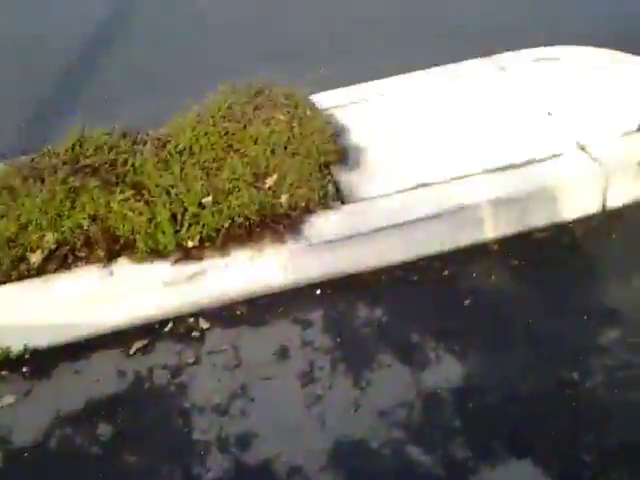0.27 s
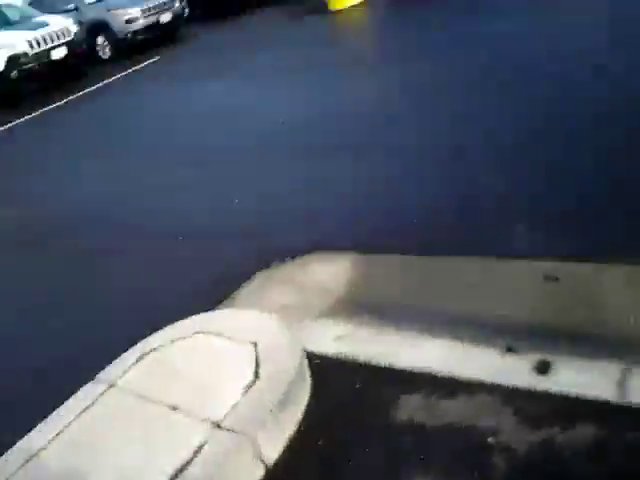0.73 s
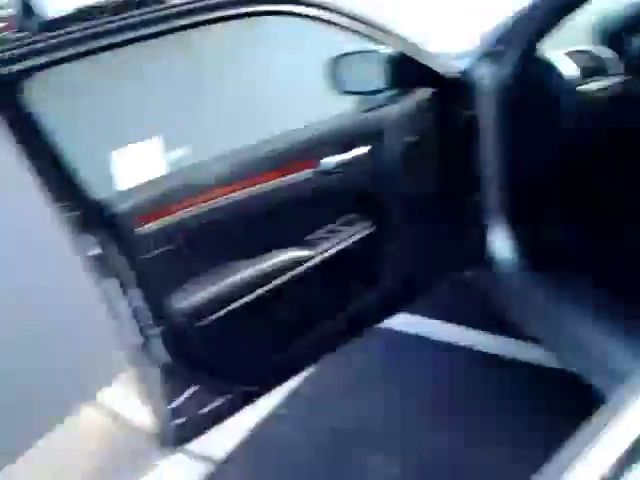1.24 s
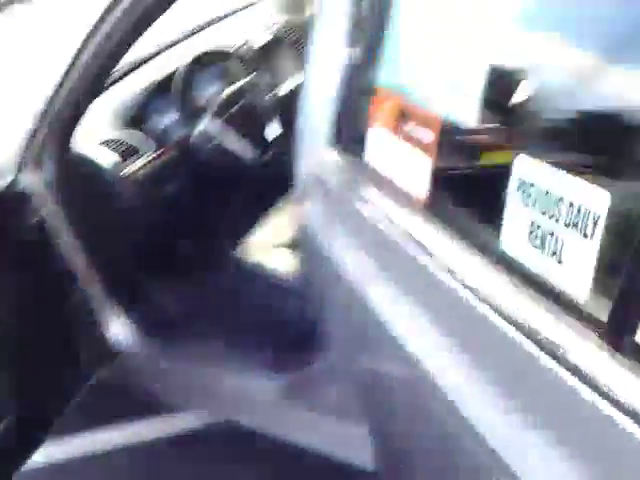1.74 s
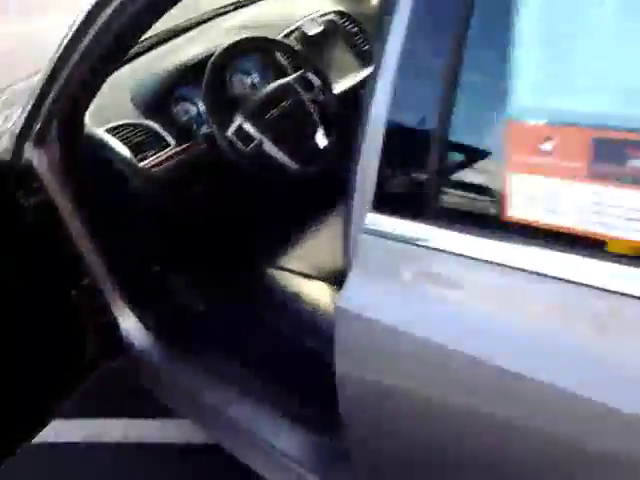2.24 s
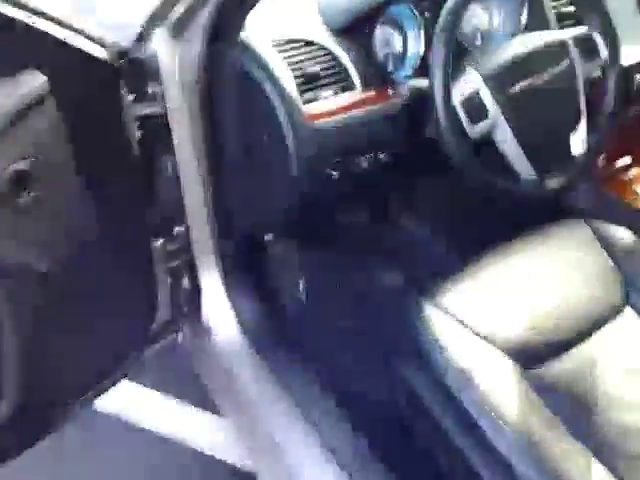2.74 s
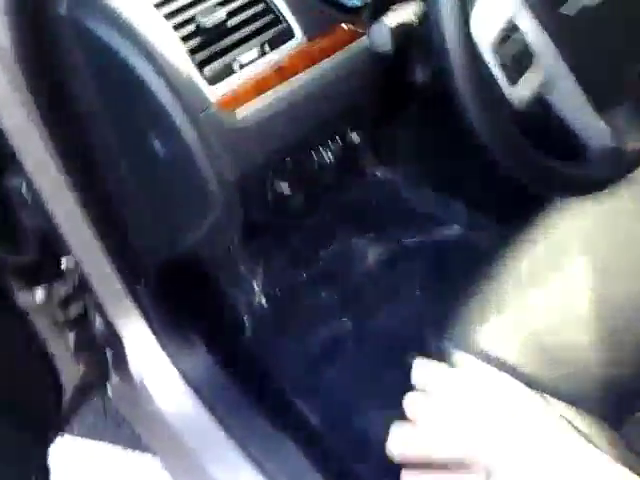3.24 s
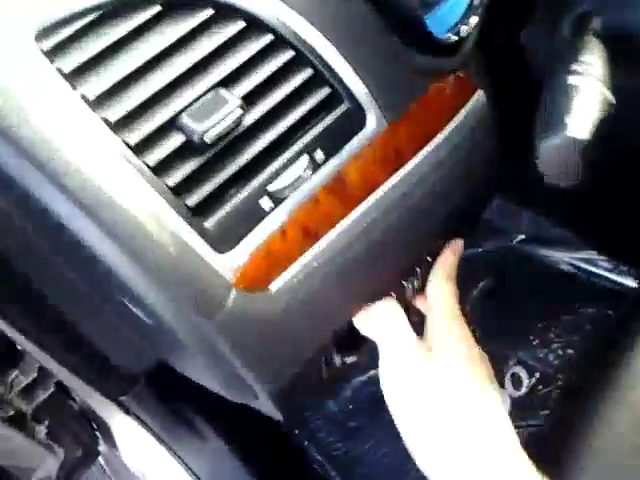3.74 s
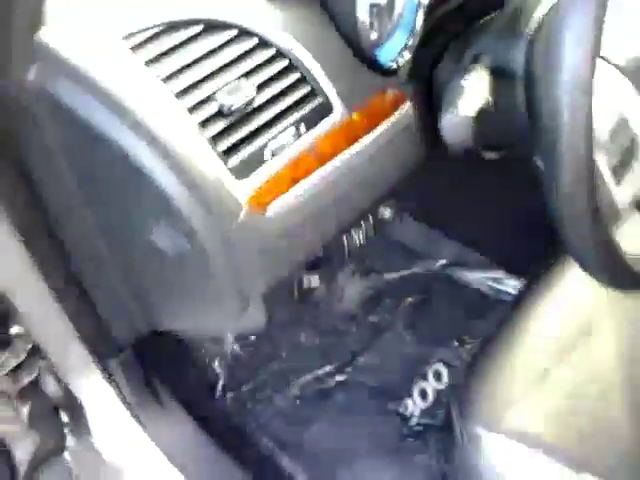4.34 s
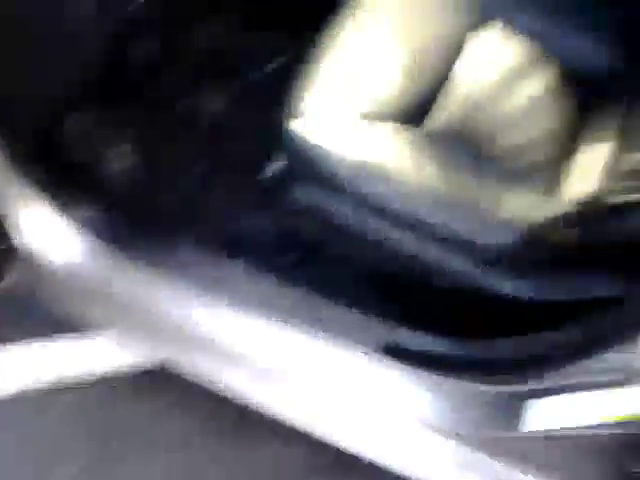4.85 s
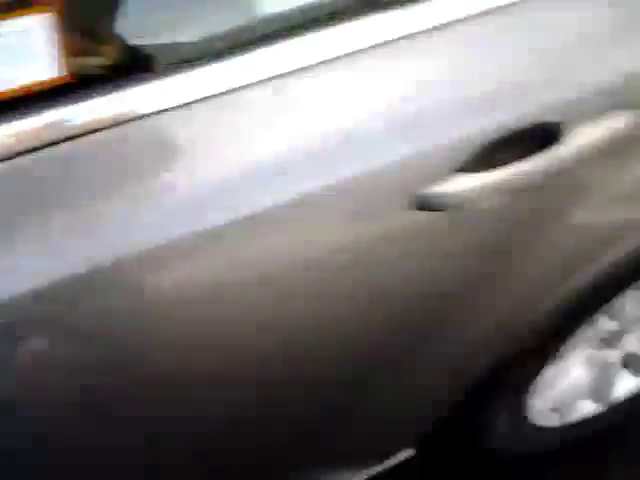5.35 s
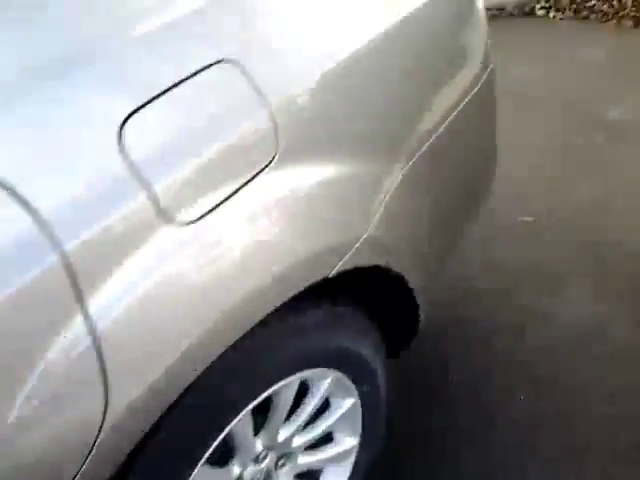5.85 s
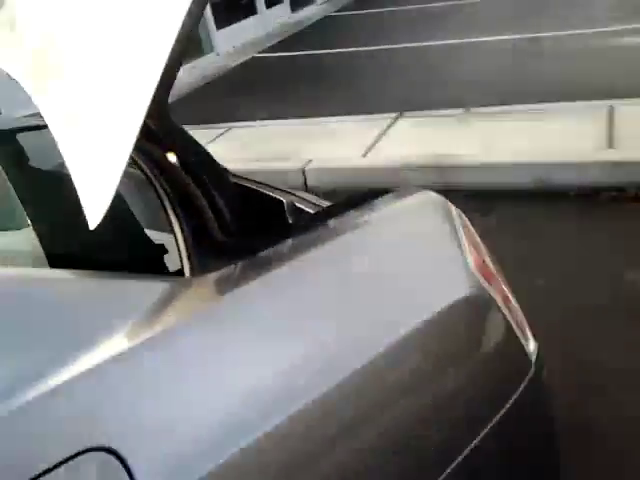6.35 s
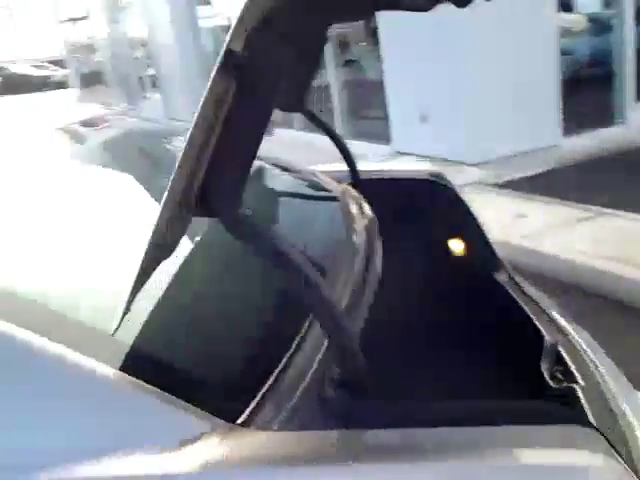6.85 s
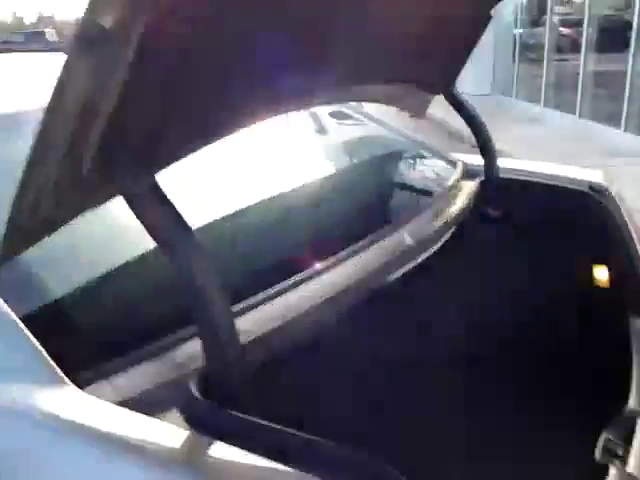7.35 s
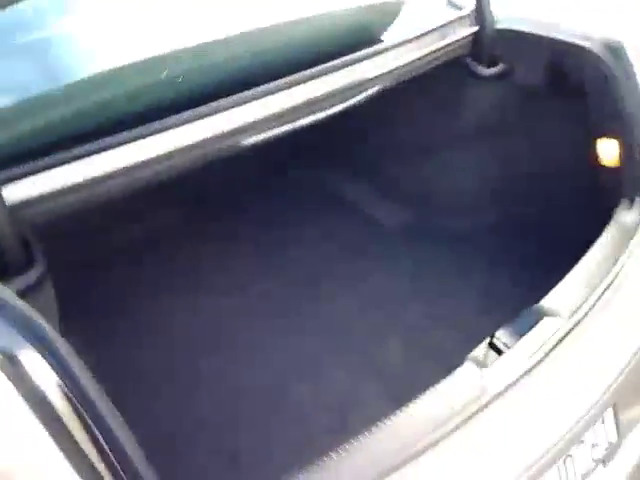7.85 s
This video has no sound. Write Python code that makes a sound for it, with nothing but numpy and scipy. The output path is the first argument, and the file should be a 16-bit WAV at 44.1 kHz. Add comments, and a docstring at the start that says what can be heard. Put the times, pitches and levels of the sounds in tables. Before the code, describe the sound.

Open car park, handheld phone microphone. Soft distant traffic roar and faint low hum run throughout; a vehicle passes early with a brief rising tyre whine. Close cloth and shoe rustle, gritty scrapes and tiny bright ticks continue on and off. A heavy rattling door knock comes first, then a shorter double-edged latch knock, and later a sharp trunk knock with dying rattle. Afterwards it thins to traffic and light rustling.

```python
"""Open car park: someone walks round parked cars holding a phone.
Far traffic, a vehicle going by, a drone and a motor hum: shaped noise, narrow noise bands and a sine.
Soles and cloth rustle and scrape: noise mixed with random grains.
Ticks on the phone, grit underfoot and latch contacts: short pings, scratches and snaps.
Three knocks of door and trunk latch, among lesser blows: thuds, ringing panel, rattling latch."""
import sys
import numpy as np
from scipy import signal
from scipy.fft import rfft, irfft
from scipy.io import wavfile

SR = 44100
rng = np.random.default_rng(int(sys.argv[2]) if len(sys.argv) > 2 else 0)


def transcribe(signal):
    """Save signal, clipped to [-1, 1], as a 16-bit WAV file at the path in sys.argv[1]."""
    frames = np.atleast_2d(signal).T
    limited = np.clip(frames, -1, 1)
    pcm = np.round(limited * 32767).astype(np.int16)
    wavfile.write(sys.argv[1], SR, pcm)


N = 356724
TIME_S = np.arange(N) / SR


def amp(db):
    """dB to gain."""
    return 10 ** (np.asarray(db) / 20)


def rms_one(x):
    """Scale to rms 1."""
    return x / np.sqrt(np.mean(x ** 2) + 1e-20)


def level_curve(rows):
    """Interpolate (time_s, level_db) rows to every sample, in dB."""
    time_s, level_db = np.transpose(rows)
    return np.interp(TIME_S, time_s, level_db)


def drift(knots_per_s):
    """Random wander: unit-spread normal knots joined by straight lines, at most 60 per second."""
    knots = rng.standard_normal(int(N / SR * 60) + 2)
    return np.interp(TIME_S * min(knots_per_s, 60), np.arange(len(knots)), knots)


def noise():
    """White noise of rms near 1."""
    return rng.standard_normal(N)


def coloured(x, spectrum):
    """Filter a white signal to a spectrum drawn over log frequency; rms 1."""
    freq_hz, density_db = np.transpose(spectrum)
    log_hz = np.log(np.arange(N // 2 + 1) * SR / N + 1e-3)
    gain_db = np.interp(log_hz, np.log(freq_hz), density_db, left=-120, right=-120)
    return rms_one(irfft(rfft(x) * amp(gain_db), N))


def filtered(x, order, edge_hz, kind):
    """Butterworth filter."""
    return signal.sosfilt(signal.butter(order, edge_hz, kind, fs=SR, output="sos"), x)


def narrow(centre_hz, width_hz):
    """Noise in a narrow band round a fixed or moving centre; rms 1."""
    slow = filtered(rng.standard_normal((2, N)), 2, width_hz / 2, "low")
    phase = 2 * np.pi * np.cumsum(centre_hz * np.ones(N)) / SR
    return rms_one(slow[0] * np.cos(phase) + slow[1] * np.sin(phase))


def grains(per_s, spread_db):
    """Random contacts with uneven strengths and signs; rms 1."""
    sizes = amp(spread_db * np.minimum(rng.exponential(1, N), 4))
    signed = sizes * rng.choice([-1, 1], N)
    return rms_one(signed * (rng.random(N) < per_s / SR))


def ring(x, pitch_hz, t60_s):
    """Two-pole resonator: a unit click sets a decaying sine of height 1 ringing."""
    radius = amp(-60 / (max(t60_s, .001) * SR))
    turn = 2 * np.pi * pitch_hz / SR
    feedback = [1, -2 * radius * np.cos(turn), radius * radius]
    return signal.lfilter([0, np.sin(turn)], feedback, x + 1e-18)


def modes(x, table):
    """A body: its modes ring in parallel, signs alternating."""
    body = np.zeros(N)
    for k, (pitch_hz, level_db, t60_s) in enumerate(table):
        body += (-1) ** k * amp(level_db) * ring(x, pitch_hz, t60_s)
    return body


def add(track, start_s, piece):
    """Mix a piece in at its start time."""
    at = round(start_s * SR)
    track[at:at + len(piece)] += piece[:N - at]


# far tyre roar: time_s, level_db
ROAR_LEVEL = [(0, -42.5), (.5, -40.5), (1.1, -39.5), (1.5, -42), (1.95, -39.5), (2.55, -41.5),
              (2.85, -42.5), (3.6, -42.5), (4.4, -42), (5.4, -42.5), (6.05, -40.5), (6.8, -40.5),
              (7.1, -41.5), (8.09, -44)]
# relative spectra of engine rumble and tyre roar: freq_hz, density_db
RUMBLE_SPECTRUM = [(18, -56), (30, -56), (59, -46), (74, -9.5), (118, -4.5), (150, -6), (201, 1.5),
                   (480, 1), (620, -94), (1060, -120)]
ROAR_SPECTRUM = [(280, -93), (480, 1), (892, 0.5), (1450, -7), (1910, -7.5), (2280, -10), (2800, -14.5),
                 (3640, -17), (6160, -120)]
RUMBLE_DB, RUMBLE_FOLLOWS = -45.5, 0.716   # level at mean traffic; share of the roar's dB swing


def far_traffic():
    """Distant engines and tyres: two shaped noises that swell together, each with its own wander."""
    roar_db = level_curve(ROAR_LEVEL)
    rumble_db = RUMBLE_DB + RUMBLE_FOLLOWS * (roar_db - roar_db.mean())
    rumble = amp(rumble_db + 2.8 * drift(7.2)) * coloured(noise(), RUMBLE_SPECTRUM)
    roar = amp(roar_db + 1.2 * drift(12)) * coloured(noise(), ROAR_SPECTRUM)
    return rumble + roar


# relative spectrum of the nearer vehicle: freq_hz, density_db
PASSING_SPECTRUM = [(88, -46), (150, -11), (243, 2), (376, -4), (498, -53), (638, -9), (685, -5.5),
                    (898, -5), (1230, -9), (1510, -8), (2500, -17.5), (3250, -39.5), (5500, -120)]
PASS_DB, PASS_NEAREST_S, PASS_SPAN_S = -37, 1.22, 0.635   # span: nearest distance over speed
PASS_HIDDEN_S, PASS_HIDE_FADE_S = 3.19, 0.23
WHINE_DB, WHINE_S, WHINE_FADE_DB = -40.5, 1.1, 61.5   # top level, its time, loss 1 s away from it
WHINE_HZ, WHINE_CLIMB_HZ_PER_S, WHINE_TOP_HZ = 874.4, 220, 909   # pitch at WHINE_S, climb, ceiling


def passing_vehicle():
    """Noise falling as 1/distance until hidden, with a tyre whine that climbs as the vehicle speeds up."""
    distance = np.hypot(1, (TIME_S - PASS_NEAREST_S) / PASS_SPAN_S)
    in_view = np.clip((PASS_HIDDEN_S - TIME_S) / PASS_HIDE_FADE_S, 0, 1)
    wash = amp(PASS_DB) * in_view / distance * coloured(noise(), PASSING_SPECTRUM)
    from_top_s = TIME_S - WHINE_S
    whine_hz = np.minimum(WHINE_HZ + WHINE_CLIMB_HZ_PER_S * from_top_s, WHINE_TOP_HZ)
    whine = amp(WHINE_DB - WHINE_FADE_DB * from_top_s ** 2) * narrow(whine_hz, width_hz=130.0)
    return wash + whine


# motor hum: time_s, level_db
HUM_LEVEL = [(0, -54), (2.5, -54), (3.1, -71), (4.9, -66.5), (5.4, -53), (6.4, -61), (6.9, -85),
             (7.5, -58.5), (8.09, -55.5)]
HUM_HZ = 127.1
PARTNER_HZ, PARTNER_REL_DB, PARTNER_WIDTH_HZ = 190, -6, 8.6   # rough tone, level relative to the hum


def motor_hum():
    """A wavering sine and a rough narrow-band partner that comes and goes with it."""
    level_db = level_curve(HUM_LEVEL)
    phase = 2 * np.pi * HUM_HZ * TIME_S + 0.45 * drift(1.88)
    hum = np.sqrt(2) * amp(level_db + 2.44 * drift(2.43)) * np.sin(phase)
    return hum + amp(level_db + PARTNER_REL_DB) * narrow(PARTNER_HZ, PARTNER_WIDTH_HZ)


# rustle of soles and cloth, then its fine hiss: time_s, level_db
RUSTLE_LEVEL = [(0, -40.5), (.13, -45), (.85, -45), (1.3, -41), (1.6, -45), (1.85, -40.5), (2.23, -41),
                (2.34, -48), (2.59, -43.5), (2.81, -41.5), (2.95, -52), (3.2, -44.5), (3.55, -43),
                (3.83, -50.5), (4.1, -43.5), (4.44, -49.5), (4.59, -44), (5.27, -42.5), (5.72, -47),
                (6.24, -45), (6.94, -49), (7.19, -46), (7.8, -53), (8.09, -49)]
HISS_LEVEL = [(0.0, -56), (0.97, -63.5), (1.67, -55), (1.93, -50), (2.34, -63.5), (2.57, -54.5),
              (2.79, -52), (2.95, -63), (3.2, -56.5), (3.45, -53.5), (3.78, -58.5), (4.44, -57.5),
              (4.64, -56), (7.14, -59.5), (7.79, -62), (8.09, -61.5)]
# relative spectra of the rustle and of all fine friction hiss: freq_hz, density_db
RUSTLE_SPECTRUM = [(1180, -13.5), (2000, -9.5), (2760, -2.5), (3690, 1.5), (4170, 4), (4960, -5.5),
                   (5800, -14.5), (6500, -18.5), (8450, -30.5), (14300, -120)]
HISS_SPECTRUM = [(3530, -5.5), (6000, -4.5), (10000, -6.5), (12600, -13), (14100, -11.5), (15000, -21),
                 (15500, -52)]


def rustle():
    """Smooth friction: noise and dense grains that swell and flutter, with body and hiss."""
    friction = noise() + 0.542 * grains(1400, spread_db=5.53)
    flutter = amp(.8 * drift(30))
    body = amp(level_curve(RUSTLE_LEVEL)) * coloured(friction, RUSTLE_SPECTRUM)
    hiss = amp(level_curve(HISS_LEVEL)) * coloured(friction, HISS_SPECTRUM)
    return flutter * (body + hiss)


# short scrapes: start_s, end_s, body_db, hiss_db (levels at the start), change_db (start to end)
SCRAPES = [(0, 0.088, -46, -42.5, -1), (0.187, 0.221, -42, -40, -5), (0.26, 0.318, -42, -50, -4),
           (0.625, 0.703, -34, -51.5, -6.5), (0.698, 0.729, -50, -53, 0), (1.319, 1.389, -35, -57, 3.5),
           (1.384, 1.423, -40, -51, -7.5), (1.512, 1.533, -52.5, -40, -8), (1.77, 1.896, -43.5, -51, 6),
           (1.983, 2.035, -39.5, -46.5, 8.5), (2.031, 2.179, -34.5, -47, -5.5), (2.54, 2.59, -45, -49, -1),
           (2.83, 2.953, -44.5, -48.5, 5), (2.951, 3.006, -42, -49, -10), (3.298, 3.374, -43, -60, 5.5),
           (3.978, 3.994, -29.5, -51, 0), (4.409, 4.47, -32.5, -42, -18.5), (4.867, 4.94, -35, -66, -10),
           (5.12, 5.148, -45, -47.5, -7), (5.317, 5.337, -47, -60.5, 5), (5.398, 5.42, -43, -52.5, 0),
           (5.442, 5.487, -42, -58, -3), (6.563, 6.6, -38.5, -75, -6), (7.123, 7.211, -55, -58, 0),
           (7.636, 7.729, -53.5, -61, 2), (8, 8.053, -43.5, -85, -1.5)]
# relative spectrum of a scrape's body: freq_hz, density_db
SCRAPE_SPECTRUM = [(1180, -5), (2000, -6), (2350, -4.5), (2560, -6), (3100, -3), (3740, 1), (4350, 0),
                   (5000, -6), (6500, -24.5), (8450, -21.5), (14300, -120)]
SCRAPE_EDGE_S = 0.0061


def scrapes():
    """Gritty friction: noise and sparse grains gated into strokes with abrupt ends."""
    friction = noise() + 0.72 * grains(500, spread_db=2.8)
    body, hiss = np.zeros((2, N))
    for start_s, end_s, body_db, hiss_db, change_db in SCRAPES:
        length_s = end_s - start_s
        inside_s = TIME_S[(TIME_S >= start_s) & (TIME_S < end_s)] - start_s
        to_edge_s = np.minimum(inside_s, length_s - inside_s)
        shape = amp(change_db * inside_s / length_s) * np.minimum(1, to_edge_s / SCRAPE_EDGE_S)
        add(body, start_s, amp(body_db) * shape)
        add(hiss, start_s, amp(hiss_db) * shape)
    return body * coloured(friction, SCRAPE_SPECTRUM) + hiss * coloured(friction, HISS_SPECTRUM)


# phone, grit and latch contacts, drives before filtering: start_s, ping_db, pitch_hz, t60_s,
# snap_db (bright), dull_db
TICKS = [(.024, -18, 3940, 0.0083, -32, -49), (.041, -9.5, 5020, 0.0052, -15, -39),
         (.05, -24, 4200, .008, -36, -42), (.059, -15, 4300, .008, -34, -37),
         (0.065, -17.5, 3870, 0.0086, -31, -39.5), (0.0734, -17, 4260, .008, -28, -36),
         (.081, -14, 4240, 0.007, -35, -36), (0.1903, 7, 3670, 0.0017, -14.5, -18),
         (.1914, -4.5, 2720, 0.0044, -20, -25.5), (0.1927, -1.5, 4100, 0.0038, -14, -32.5),
         (.1927, -8.5, 5900, 0.0033, -40, -41.5), (.1961, 7, 4900, 0.0018, -6, -26),
         (.1963, -11, 4100, 0.004, -40, -40), (0.284, -25, 4000, .008, -33.5, -41),
         (.2945, -23, 4500, .008, -23, -40), (.629, -17.5, 3400, 0.016, -45, -45),
         (.6302, -15, 3430, 0.015, -45, -40), (.6299, -10, 3970, 0.0138, -43, -40),
         (0.6324, -11, 4065, .007, -34.5, -21), (.636, -20, 4200, .012, -40, -40),
         (.643, -22, 4100, .006, -40, -40), (.6535, -24, 3650, .015, -50, -50),
         (.662, -26, 4150, .02, -50, -50), (.669, -23, 3550, .012, -50, -50),
         (0.6954, -18, 4000, .008, -38, -34.5), (0.7013, -23, 5000, .008, -39, -40),
         (.714, -25, 2400, .008, -41, -43), (0.7733, -26, 4000, 0.0089, -34, -42),
         (.906, -20, 4600, 0.0037, -37, -50), (1.145, -24, 4140, .008, -47, -37),
         (1.3265, -15.5, 4370, 0.012, -27, -32), (1.327, -30, 3580, .012, -43, -40),
         (1.341, -20, 4300, .014, -45, -45), (1.359, -25.5, 4000, .012, -45, -45),
         (1.3755, -23, 3880, .012, -45, -42), (1.379, -29, 3880, .012, -45, -45),
         (1.514, -19, 4300, 0.008, -14, -42), (1.515, -26, 8100, .01, -26.5, -60),
         (2.287, -9, 2150, .022, -30, -40), (2.2862, -10, 3773, .035, -32, -40),
         (2.2872, -8, 4360, 0.025, -33, -40), (2.3005, -8, 3804, 0.0296, -40, -48),
         (2.2985, -12, 5890, .016, -22.5, -27), (2.3085, -14.5, 3225, 0.0215, -40, -40),
         (2.3375, -17, 4480, .025, -40, -40), (2.3585, -21, 3730, .018, -42, -40),
         (2.3695, -25.5, 4600, .018, -41.5, -40), (2.302, -9, 4400, .015, -19, -28),
         (2.325, -12, 3820, 0.0163, -30, -30), (2.328, -11, 4420, 0.0323, -28, -30),
         (2.361, -19, 4440, .02, -42.5, -40), (2.5419, -14.5, 4500, 0.0028, -27, -50),
         (2.544, -17.5, 4000, .004, -23, -50), (2.5455, -18, 3880, .006, -31, -50),
         (2.5512, -16, 4000, .003, -45, -50), (2.5602, -24, 4500, .006, -40, -50),
         (2.6103, -7, 4330, 0.0074, -40, -60), (2.61, -27, 6700, 0.0023, -40, -60),
         (2.6121, -26, 4200, .004, -50, -60), (2.719, -24.5, 3880, 0.0057, -28, -40),
         (2.897, -20.5, 4620, 0.0062, -23, -25), (2.914, -28, 4120, .01, -36, -46),
         (2.918, -17, 2840, 0.006, -23, -36), (2.917, -5.5, 4250, 0.0033, -20, -34),
         (2.9272, -15.5, 4400, .005, -34.5, -50), (2.9347, -22, 4300, .004, -36, -50),
         (2.937, -27.5, 3900, .008, -45, -50), (2.939, -5, 3930, 0.0026, -29, -24),
         (2.9471, -23, 4100, .005, -45, -48), (2.949, -14, 4240, 0.0043, -26, -27),
         (3.346, -21, 1950, 0.0067, -33, -27), (3.7779, -34, 4250, .008, -36, -40),
         (3.817, -24.5, 3920, 0.01, -27, -41), (3.9812, -16.5, 2500, 0.0061, -24, -40),
         (4.4088, -7, 4030, 0.0039, -20, -28), (4.4136, -0.5, 3950, 0.0047, -13, -21),
         (4.4151, -4, 1930, 0.0032, -17.5, -35.5), (4.4143, -2, 2710, 0.00437, -23, -20),
         (4.476, -24.5, 4360, 0.0114, -28, -36.5), (4.587, -22, 4720, 0.0081, -16.5, -37),
         (4.6192, -20.5, 4800, .006, -34.5, -41.5), (4.6223, -7, 4100, .003, -19.5, -50),
         (4.6345, -17, 2900, .01, -30, -40), (4.6345, -19, 5500, .008, -40, -50),
         (4.6402, -12, 4135, 0.015, -34, -40), (4.6422, -7, 4000, .006, -31, -16),
         (4.6442, -9, 4660, .006, -33, -40), (4.658, -18.5, 4000, .015, -38.5, -50),
         (4.883, -19, 4030, 0.0073, -42, -33.5), (4.885, -23.5, 1950, .008, -43, -39),
         (5.125, -25, 3220, .008, -24.5, -42), (5.311, -30.5, 2300, .006, -52, -45),
         (5.316, -28.5, 3700, .015, -50, -47), (5.328, -19, 4200, .004, -26, -46),
         (5.4028, -15, 4970, 0.003, -34, -45), (5.404, -20, 3800, .005, -35, -45),
         (5.4075, -21, 4200, 0.0089, -38, -45), (5.454, -26, 3580, 0.014, -44, -45),
         (5.458, -24, 3500, .01, -44, -50), (5.473, -28.5, 4000, .01, -44, -50),
         (5.511, -19, 3590, 0.005, -32, -37), (5.511, -23.5, 5800, .004, -50, -50),
         (6.578, -30, 4040, .008, -45.5, -30), (6.6436, -14, 2140, 0.018, -28, -30),
         (6.643, -14, 4250, .02, -27, -31), (6.646, -11, 3713, 0.014, -21, -31),
         (6.673, -30, 4060, 0.028, -45, -50), (7.64, -16, 4500, 0.0042, -60, -44),
         (7.6592, -26, 4130, .008, -39, -43)]
# modes of phone shell and port: pitch_hz, level_db, t60_s
SHELL_MODES = [(3850, -28, 0.0088), (4700, -31.5, 0.013), (5200, -17.5, 0.0014)]
PING_RISE_S, SCRATCH_OUTLASTS = 0.0002, 1.2   # scratch t60 over ping t60
DULL_HZ, DULL_T60_S = 1800, 0.00545
SNAP_BAND_HZ, SNAP_T60_S = [5950, 11900], 0.0014


def ticks():
    """A sharp contact pings at its own pitch, with dull and bright edges and a short scratch in the shell."""
    t = np.arange(2000) / SR
    pings, scratches, dull, bright = np.zeros((4, N))
    for start_s, ping_db, pitch_hz, t60_s, snap_db, dull_db in TICKS:
        grit = rng.standard_normal(len(t))
        envelope = amp(ping_db - 60 * t / t60_s) * (1 - np.exp(-t / PING_RISE_S)) ** 2
        add(pings, start_s, envelope * np.sin(2 * np.pi * pitch_hz * t))
        add(scratches, start_s, amp(ping_db - 60 * t / (t60_s * SCRATCH_OUTLASTS)) * grit)
        add(dull, start_s, amp([dull_db]))
        add(bright, start_s, amp(snap_db - 60 * t / SNAP_T60_S) * np.sign(grit))
    snap = filtered(bright + 1e-18, 2, SNAP_BAND_HZ, "band")
    shell = pings + modes(scratches, SHELL_MODES) + ring(dull, DULL_HZ, DULL_T60_S)
    return filtered(shell, 2, [1300, 7500], "band") + snap   # too small to move bass


# blows, drives before the bodies: start_s, thud_db, thud_hz, shake_db, rattle_db, t60_s,
# treble_edge_hz (of the rattle)
BLOWS = [(.6315, -16, 520, -45, -62, 0.01, 5000), (.632, -16.5, 1044, -40, -62, 0.013, 5000),
         (1.189, -32, 504, -32, -57, 0.013, 4000), (2.2827, -11, 580, -19.5, -26, 0.0176, 4000),
         (2.2855, -4, 324, -25, -11, 0.0487, 6100), (2.2865, -10, 600, -27, -15.5, 0.057, 6000),
         (2.2975, -5, 910, -21, -13, 0.029, 12600), (2.299, -3, 315, -30, -40, 0.046, 6000),
         (2.2995, -17, 1730, -30, -40, .03, 6000), (2.3005, -9.5, 1276, -16, -10.5, 0.0333, 10000),
         (2.302, -7, 598, -15.5, -26, 0.0375, 8000), (2.3066, -15, 288, -25, -17, 0.046, 9900),
         (2.3246, -7.5, 280, -19, -14, 0.0495, 7600), (2.326, -15.5, 1750, -40, -40, 0.027, 6000),
         (2.337, -15, 590, -21, -20, 0.054, 5900), (2.339, -6.5, 376, -16, -33.5, 0.033, 7800),
         (2.312, -18.5, 155, -28, -35, 0.18, 6000), (2.346, -23.5, 99, -31, -32, 0.12, 6000),
         (2.36, -10, 243, -26, -18.5, 0.065, 5470), (2.36, -18, 1380, -40, -40, .03, 5500),
         (2.368, -15, 400, -22.5, -29, 0.0325, 5500), (2.3752, -7.5, 225, -37, -42.5, 0.033, 5500),
         (2.386, -19, 374.4, -35, -35, 0.06, 5000), (2.404, -28, 331, -33, -38, 0.068, 5000),
         (3.773, -26.5, 624, -34, -36, 0.047, 5000), (4.6335, -9.5, 363, -30.5, -17, .03, 12100),
         (4.6345, -9, 866, -25.5, -22, 0.0245, 9000), (4.636, -21, 160, -44, -50, .05, 6000),
         (4.639, -9.5, 334, -30, -20, 0.033, 8350), (4.641, -11.5, 1010, -20.5, -26, 0.027, 8400),
         (4.6425, -7, 341.3, -22, -31.5, 0.0348, 8500), (4.646, -9, 648, -35, -29, 0.0233, 8000),
         (4.651, -18, 1131, -34, -28, 0.032, 9000), (4.6525, -15.5, 426, -34, -24, 0.018, 9000),
         (4.659, -27, 690, -38, -33.5, 0.038, 8060), (4.68, -30, 680, -45, -50, .025, 5000),
         (4.803, -27.5, 1430, -42, -26, 0.088, 8800), (4.811, -23.5, 1777, -45, -37, 0.045, 8000),
         (4.819, -19.5, 1784, -40, -21, 0.034, 8400), (4.831, -34.5, 1680, -45.5, -27, .04, 8000),
         (5.225, -21.5, 500, -35, -62, 0.0192, 3000), (5.2327, -16, 440, -43.5, -60, 0.015, 3000),
         (5.611, -19.5, 148, -39, -60, 0.033, 3000), (6.6125, -15, 254, -32, -64, 0.0296, 3000),
         (6.6275, -36.5, 700, -35, -24, 0.066, 6000), (6.633, -25, 1202, -33.5, -28, 0.058, 5460),
         (6.6415, -18, 1050, -35, -15.5, 0.0468, 13900), (6.644, -7.5, 266, -22, -32, .025, 9000),
         (6.6456, -1.5, 481, -23.5, -14.5, 0.03, 14000), (6.6519, -19, 858, -38.5, -22, 0.037, 12000),
         (6.661, -20, 660, -29, -28, 0.044, 11000), (6.667, -18, 480, -28, -29.5, 0.045, 11000),
         (6.6735, -20, 384, -32, -28.5, 0.0524, 11000), (6.679, -24, 216, -38, -48, .06, 6000),
         (6.69, -27.5, 110, -41, -38, 0.15, 6000), (6.691, -26, 680, -41, -50, 0.036, 5000),
         (6.701, -25.5, 259, -36, -50, .06, 5000), (6.716, -15, 300, -42, -46.5, 0.0222, 5000),
         (6.7187, -19.5, 500, -45.5, -48.5, .03, 4000), (6.7243, -12.5, 300, -47.5, -43.5, 0.024, 4000),
         (6.753, -21, 297, -46, -60, 0.025, 3000)]
# modes of door and lid skin, then of latch parts: pitch_hz, level_db, t60_s
PANEL_MODES = [(161, -9.5, 0.084), (237, -19, 0.049), (288.3, -3, 0.0524), (337, 3.5, 0.034),
               (433.5, 4.5, 0.022), (573.5, 3.5, 0.027), (709, 3, 0.027), (803, 1, 0.023), (1007, 0, 0.018)]
LATCH_MODES = [(1342, -3.5, 0.0065), (1730, -7, 0.01), (2160, -5, 0.0088), (2743, -3, 0.0046),
               (3174, -4, 0.0071), (3510, -10, 0.022), (3920, -5.5, 0.015), (4436, -10.5, 0.016),
               (4870, -13.5, 0.015), (4762, 0.5, 0.0035), (6200, -38, 0.017)]
PANEL_DB, LATCH_DB = -23.5, -13   # how well each body radiates
CRUNCH_EDGE_HZ, CRUNCH_DB = 1600, -6   # unringing part of the contacts
RATTLE_PER_S, RISE_S = 4900, 0.002212
STRIKE_PANEL_DB, STRIKE_LATCH_DB = 21.5, -3.5   # first clean contact, relative to shake and rattle


def knocks():
    """Each blow: a damped swing, a clean strike, a shake of sheet metal and a burst of latch contacts."""
    t = np.arange(8000) / SR
    contacts, tremor = grains(RATTLE_PER_S, spread_db=2.8), noise()
    thuds, shake, rattle = np.zeros((3, N))
    for start_s, thud_db, thud_hz, shake_db, rattle_db, t60_s, treble_edge_hz in BLOWS:
        decay = amp(-60 * t / max(t60_s, .005))
        swing = (1 - np.exp(-t * thud_hz * 2)) * np.sin(2 * np.pi * thud_hz * t)
        add(thuds, start_s, amp(thud_db) * decay * swing)
        shape = decay * (1 - np.exp(-t / RISE_S))
        at = round(start_s * SR)
        add(shake, start_s, amp(shake_db) * shape * tremor[at:at + len(t)])
        add(shake, start_s, amp([shake_db + STRIKE_PANEL_DB]))
        add(rattle, start_s + RISE_S / 2, amp([rattle_db + STRIKE_LATCH_DB]))
        burst = amp(rattle_db) * shape * contacts[at:at + len(t)]
        # each burst is dulled to its own treble edge
        add(rattle, start_s, filtered(burst, 4, min(treble_edge_hz, .4 * SR), "low"))
    panel = amp(PANEL_DB) * modes(shake, PANEL_MODES)
    latch = amp(LATCH_DB) * modes(rattle, LATCH_MODES)
    crunch = amp(CRUNCH_DB) * filtered(rattle + 1e-18, 1, CRUNCH_EDGE_HZ, "high")
    return thuds + filtered(panel + latch + crunch, 3, 160, "high")   # open panels shed no deep bass


DRONE_DB, DRONE_HZ, DRONE_WIDTH_HZ = -52, 304, 17.4
DRONE_ON_S, DRONE_OFF_S, DRONE_FADE_S = 2.97, 5.33, 0.37


def drone():
    """A faint rough tone: a narrow noise band faded in and out."""
    to_edge_s = np.minimum(TIME_S - DRONE_ON_S, DRONE_OFF_S - TIME_S)
    fade = np.clip(to_edge_s / DRONE_FADE_S, 0, 1)
    return amp(DRONE_DB) * fade * narrow(DRONE_HZ, DRONE_WIDTH_HZ)


def scene():
    """All sources reach one capsule, heard alike in both channels."""
    surroundings = far_traffic() + passing_vehicle() + motor_hum()
    close_by = rustle() + scrapes() + ticks()
    return np.tile(surroundings + close_by + knocks() + drone(), (2, 1))


MIC_LOW_HZ, MIC_NOISE_DB, CUTOFF_HZ = 101.5, -76, 15900


def record(dry):
    """The small capsule loses deep bass and adds faint low noise; peaks are rounded, the top is cut."""
    capsule = filtered(dry, 3, MIC_LOW_HZ, "high")
    low_noise = amp(MIC_NOISE_DB) * rms_one(signal.lfilter([1], [1, -.995], noise()))
    rounded = (capsule + low_noise) / (1 + capsule ** 4) ** .25
    return signal.sosfilt(signal.cheby2(16, 90, CUTOFF_HZ, fs=SR, output="sos"), rounded)


dry = scene()
out = record(dry)
transcribe(out)
```